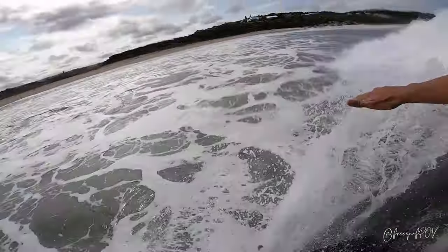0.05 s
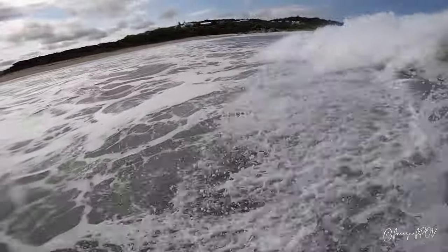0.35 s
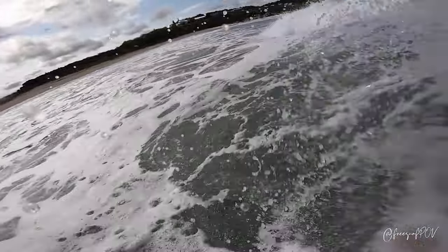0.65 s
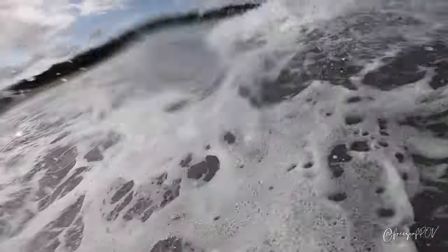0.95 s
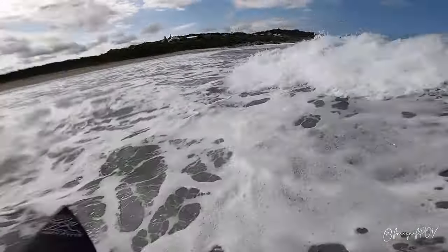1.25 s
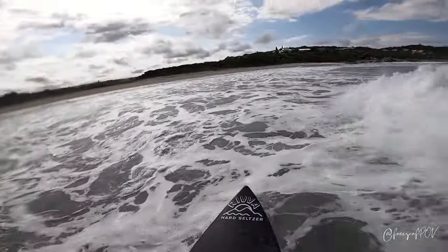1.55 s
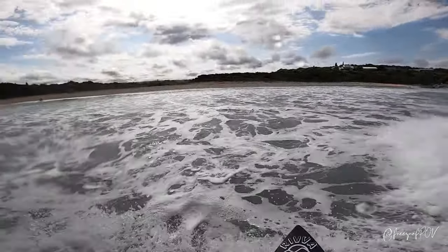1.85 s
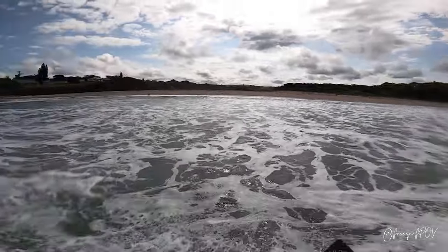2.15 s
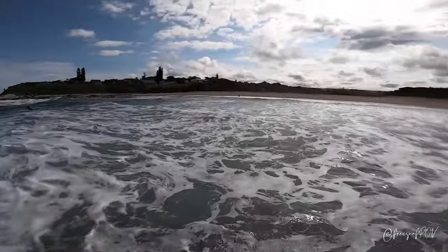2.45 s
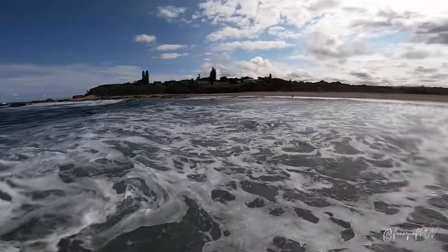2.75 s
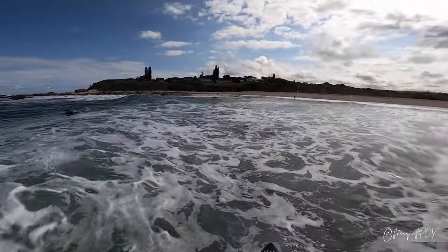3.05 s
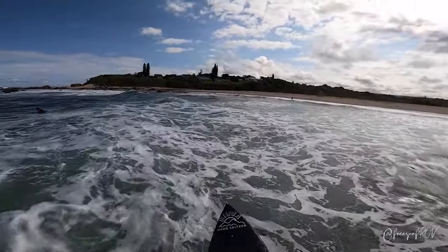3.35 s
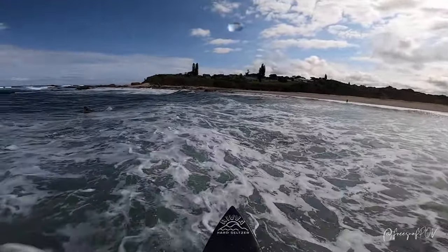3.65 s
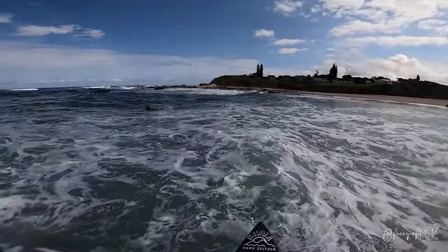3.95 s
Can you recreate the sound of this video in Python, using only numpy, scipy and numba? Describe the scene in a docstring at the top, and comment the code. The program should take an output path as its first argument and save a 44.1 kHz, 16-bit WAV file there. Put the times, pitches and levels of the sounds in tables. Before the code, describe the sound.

White water roars and gurgles close around a surfboard, muffled, with wind rumble.

```python
"""Booming water, buffeting wind and flying spray: a surfer rides through white water, wet camera held close.
The rush of the wave rings in the water-filmed microphone port, and the ring sinks as the ride goes on.
Muffled foam fizzes above it and drops tap the housing. Underfoot the board gurgles, gulps pockets
of air and throws up sheets of water. Everything reaches the one microphone, in mono."""
import sys
import numpy as np
from scipy import signal
from scipy.fft import rfft, irfft
from scipy.io import wavfile
from scipy.ndimage import uniform_filter1d, minimum_filter1d
from numba import njit

SR = 44100
rng = np.random.default_rng(int(sys.argv[2]) if len(sys.argv) > 2 else 0)


def materialize(psi):
    """Save the field psi as 16-bit PCM at rate SR to the path in sys.argv[1].

    A 1-D psi becomes a single channel; in a 2-D psi each row is a channel.
    """
    bounded = np.clip(np.atleast_2d(psi).T, -1, 1)
    quanta = np.round(bounded * 32767).astype(np.int16)
    wavfile.write(sys.argv[1], SR, quanta)


N = 176400

# water film over the microphone port: f/Hz, gain/dB
WATER_FILM = [(100, -7.5), (300, 3), (480, 1.5), (570, 0.5), (660, 0), (715, -4), (775, -17.5),
              (1100, -37.5), (2500, -57)]


def undb(db):
    return 10 ** (np.asarray(db) / 20)


def unit(x):
    """Scale to rms 1."""
    return x / np.sqrt(np.mean(x ** 2))


def curve(rows, column=1):
    """One column of a table, joined by straight lines in time."""
    rows = np.array(rows, float)
    return np.interp(np.arange(N) / SR, rows[:, 0], rows[:, column])


def colour(x, points, rolloff_db_per_oct=30):
    """Causal filter through (f/Hz, gain/dB) points, falling steeply above the last."""
    hz, db = np.array(points, float).T
    octave = np.log2(np.arange(N // 2 + 1) * SR / N + 1)
    octaves_above = np.maximum(octave - np.log2(hz[-1]), 0)
    gain_db = np.interp(octave, np.log2(hz), db) - rolloff_db_per_oct * octaves_above
    cepstrum = irfft(np.log(undb(gain_db)), N)
    cepstrum[1:N // 2] *= 2  # fold to minimum phase
    cepstrum[N // 2 + 1:] = 0
    return irfft(rfft(x) * np.exp(rfft(cepstrum)), N)


@njit
def resonate(x, hz, width_hz):
    """Band-pass with a moving centre."""
    y, band_state, low_state = np.empty(len(x)), 0., 0.
    for i in range(len(x)):
        g, damping = np.tan(np.pi * hz[i] / SR), width_hz / hz[i]
        band = (band_state + g * (x[i] - low_state)) / (1 + g * (g + damping))
        band_state = 2 * band - band_state
        low_state += 2 * g * band
        y[i] = damping * band
    return y


def cavity(x, hz, width_hz):
    """A fixed resonance with steep skirts: two band-passes in series."""
    centre, width = np.full(N, float(hz)), float(width_hz)
    return resonate(resonate(x, centre, width), centre, width)


def walk(rate_hz):
    """Smooth random wander with spread 1."""
    span = max(int(SR / rate_hz), 1)
    drift = uniform_filter1d(rng.standard_normal(N), span, mode="wrap")
    return unit(uniform_filter1d(drift, span, mode="wrap"))


def steady(x, span_s):
    """Hold the rms at 1 over the span, leaving the quick flutter."""
    span = max(int(span_s * SR), 2)
    return x / np.sqrt(uniform_filter1d(uniform_filter1d(x ** 2, span), span // 2) + 1e-12)


def pops(per_s, spread_db=0):
    """Random tiny bursts; a spread makes a few stronger than the rest."""
    size = undb(spread_db * np.minimum(rng.exponential(size=N), 6))
    return (rng.random(N) < per_s / SR) * size * rng.choice([-1, 1], N)


def swells(rows, attack_s=0.0061):
    """Level of surges that rise, hold and die away."""
    t, level = np.arange(N) / SR, np.zeros(N)
    for at, hold, release, db in rows:
        rise = np.clip((t - at) / attack_s, 0, 1)
        level += undb(db) * rise * np.exp(-np.maximum(t - at - hold, 0) / release)
    return level


def splat(at, decay_s):
    """The dying noise burst of one impact."""
    age = np.arange(N) / SR - at
    return rng.standard_normal(N) * (age >= 0) * np.exp(-np.abs(age) / decay_s)


def white_water():
    """Churn, bursting foam and flying spray around the camera flutter with the same turbulence."""
    # t/s, relative level/dB
    churn_level = [(0, -36.5), (.56, -39), (.72, -36.5), (.81, -44), (.86, -39.5), (1.0, -43), (1.13, -39),
                   (1.24, -42.5), (1.47, -37.5), (1.84, -39.5), (2.0, -35.5), (2.165, -42), (2.195, -48),
                   (2.42, -47), (2.55, -49), (2.65, -42), (2.72, -39), (2.95, -37), (3.11, -44.5),
                   (3.28, -54.5), (3.32, -39.5), (3.55, -38), (3.63, -46.5), (3.71, -39.5), (3.76, -50),
                   (4, -45.5)]  # churning water
    foam_level = [(0, -50.5), (.6, -49.5), (.92, -56), (.99, -55.5), (1.08, -53), (1.21, -55.5),
                  (1.29, -47.5), (1.39, -55), (1.46, -45.5), (1.7, -48.5), (1.88, -49.5), (2.05, -43.5),
                  (2.25, -48.5), (2.4, -49), (2.52, -53), (2.8, -52.5), (3.25, -47), (3.38, -45.5),
                  (3.53, -46), (3.63, -50.5), (3.75, -49), (3.92, -52.5), (4, -48)]  # fizzing foam
    spray_level = [(0, -41.5), (.16, -41.5), (.225, -40), (.29, -45), (.35, -41.5), (.43, -49), (.6, -62),
                   (.9, -88)]  # spray flying past the lens
    patter_level = [(0, -54.5), (.3, -51.5), (.41, -43.5), (.52, -36.5), (.61, -42.5), (.71, -40),
                    (.77, -46.5), (.80, -50.5), (.86, -49.5), (.97, -58), (1.1, -92)]  # spray drumming on the housing
    # spectra of the same four: f/Hz, level/dB
    churn_colour = [(400, -16), (700, 6.5), (860, 0.5), (1020, -4), (1180, -6), (1380, -13.5), (1900, -22),
                    (2600, -24.5), (4500, -48)]
    foam_colour = [(700, 5.5), (1400, 7.5), (2000, -0.5), (2800, -3), (3450, -8.5), (4100, -8.5),
                   (4800, -23), (5700, -29.5), (7000, -47.5), (10000, -76)]
    spray_colour = [(800, -6.5), (1400, -1), (1950, 1.5), (2350, -6), (3200, -11), (3650, -20), (4100, -20),
                    (5600, -26), (7000, -37.5), (8200, -45), (9600, -43), (11500, -57), (15000, -71)]
    patter_colour = [(800, -7), (1200, 6), (1600, 0), (2000, -1), (2400, -18), (2800, -25), (3400, -16.5),
                     (4050, -14.5), (4700, -27), (5700, -29), (7000, -37), (9500, -52.5), (14000, -72.5)]
    eddies_db = walk(rate_hz=106)
    flutter = undb(eddies_db)
    churn = unit(colour(rng.standard_normal(N), churn_colour) * undb(2 * eddies_db))
    foam = unit(colour(pops(per_s=5000, spread_db=0.5), foam_colour) * flutter)
    spray = unit(colour(pops(per_s=4000), spray_colour) * flutter)
    patter = unit(colour(pops(per_s=7100, spread_db=2), patter_colour) * flutter)
    return (churn * undb(curve(churn_level) + 6) + foam * undb(curve(foam_level) + 5)
            + spray * undb(curve(spray_level) + 3) + patter * undb(curve(patter_level)))


def smothered(x, hz=2620., width_hz=1100.):
    """A coat of foam on the microphone hollows the treble out of the sound passing through it."""
    # the foam's hollow: t/s, depth/dB
    hollow = [(.45, 4), (.65, 7.5), (.91, 2.5), (.96, 10), (1.02, 8.5), (1.07, 1)]
    band = resonate(x, np.full(N, hz), width_hz)
    return x - band * (1 - undb(-curve(hollow)))


def runoff(hz=4230, width_hz=2080):
    """Water spatters finely as it runs off the microphone."""
    # trickles: t/s, hold/s, release/s, level/dB
    trickles = [(1.025, 0.034, .01, -67), (1.072, .035, 0.017, -61.5)]
    spatter = cavity(pops(per_s=1200), hz, width_hz)
    return unit(cavity(spatter, hz, width_hz)) * swells(trickles)


def drops():
    """Right on the housing, drops land with a brief dull ring and hard flecks of spray tick."""
    # drops: t/s, peak/dB, f/Hz, decay/s
    landings = [(0.2226, -37, 4090, 0.0033), (0.769, -42, 2620, 0.0043), (0.9096, -34.5, 2400, 0.0031),
                (1.162, -43.5, 2800, .005), (1.284, -40, 2730, 0.0049), (1.342, -39, 2690, 0.0045),
                (1.823, -36.5, 2820, .005), (2.333, -32, 2590, .005), (3.021, -38, 2760, 0.0057)]
    # hard flecks: t/s, peak/dB, decay/s
    flecks = [(0.161, -42, .0006), (.2125, -40, .001), (0.2229, -30, .0025), (0.243, -44, 0.00053),
              (0.2738, -33.5, .0007), (.769, -50.5, .002), (.917, -53.5, .002)]
    # damping by the wet housing, and a fleck's spectrum: f/Hz, gain/dB
    wet_housing = [(1500, -1), (2850, -0.5), (3300, -9), (4200, -6.5), (5200, -14.5)]
    tick_colour = [(800, -8), (2000, 19.5), (3300, 11.5), (4100, 8.5), (4900, 1.5), (6200, 0.5),
                   (9000, -13), (13000, -23), (16000, -42.5)]
    out = np.zeros(N)
    for at, db, hz, decay in landings:
        tap = colour(cavity(splat(at, decay), hz, width_hz=780), wet_housing)
        out += undb(db) * tap / np.abs(tap).max()
    for at, db, decay in flecks:
        tick = colour(splat(at, decay), tick_colour)
        out += undb(db) * tick / np.abs(tick).max()
    return out


def splashes():
    """Sheets of water thrown up by the board fall as a dense bright patter."""
    # sheets: t/s, hold/s, release/s, level/dB
    sheets = [(1.419, 0.14, 0.14, -42), (2.314, 0.023, 0.023, -46), (2.977, 0.038, .02, -49.5)]
    # their spectrum: f/Hz, level/dB
    sheet_colour = [(900, -14.5), (1600, -1.5), (2250, 1.5), (2800, 2), (3200, -16.5), (3700, -22),
                    (4300, -11.5), (4900, -34.5), (6000, -39.5), (8000, -63)]
    return unit(colour(pops(per_s=970), sheet_colour)) * swells(sheets)


def sloshes():
    """Water slaps and bubbles along the rail of the board, heard through the housing."""
    # slaps: t/s, hold/s, release/s, relative level/dB, f/Hz
    slaps = [(1.275, .018, .012, -32, 920), (2.135, 0.035, .007, -32, 850), (3.302, 0.088, .02, -33.5, 983),
             (3.375, .035, 0.032, -36.5, 1170), (3.415, 0.039, 0.018, -34.5, 900),
             (3.485, .06, .023, -36, 1035), (3.689, 0.019, .012, -37, 840)]
    # muffling by the wet housing: f/Hz, gain/dB
    muffling = [(700, 4.5), (1200, -2.5), (1500, -18)]
    out = np.zeros(N)
    for at, hold, release, db, hz in slaps:
        bubbling = steady(cavity(pops(per_s=900), hz, width_hz=280), span_s=0.025)
        out += bubbling * swells([(at, hold, release, db)])
    return colour(out, muffling)


def gurgle():
    """Water gurgles hollowly round the board, heard through the film on the port."""
    # gurgling: t/s, level/dB
    level = [(0, -47), (1.8, -29), (2.0, -28), (2.13, -19.5), (2.4, -24.5), (2.6, -29), (2.85, -22.5),
             (3.1, -33), (3.3, -24.5), (3.65, -27), (4, -31.5)]
    hollow = cavity(rng.standard_normal(N), hz=347, width_hz=250)
    return steady(colour(hollow, WATER_FILM), span_s=0.3) * undb(curve(level))


def gulps(rise_s=0.014, sag_s=0.14):
    """Pockets of air trapped under the board boom briefly, their pitch sagging."""
    # air pockets: t/s, starting f/Hz, peak/dB
    pockets = [(1.391, 250.5, -11), (1.428, 167, -18.5), (1.775, 187, -20), (2.16, 345, -18.5),
               (2.47, 189, -26), (2.955, 196, -17.5), (3.307, 285, -18), (3.359, 141, -17.5),
               (3.455, 140, -20), (3.631, 144.5, -16)]
    out = np.zeros(N)
    for at, hz, db in pockets:
        age = np.maximum(np.arange(N) / SR - at, 0)
        swell = age / rise_s * np.exp(1 - age / rise_s)
        cycles = hz * sag_s * (1 - np.exp(-age / sag_s))
        out += undb(db) * swell * np.sin(2 * np.pi * cycles)
    return out


def wind():
    """Slow eddies press directly on the microphone."""
    # buffeting: t/s, relative level/dB
    buffets = [(0.0, -19.5), (0.83, -18), (1.05, -27.5), (1.34, -21.5), (1.44, -32), (1.46, -19),
               (1.89, -30), (2.12, -24.5), (2.18, -54), (2.29, -26.5), (3.97, -28), (4.0, -39)]
    # its spectrum: f/Hz, level/dB
    buffet_colour = [(5, -14), (20, 2), (35, -1), (80, -2), (115, -7.5), (160, -13), (240, -25), (500, -60)]
    rumble = steady(colour(rng.standard_normal(N), buffet_colour), span_s=0.044)
    return rumble * undb(curve(buffets) - 1)


def rush():
    """The wave's rushing water makes a low roar at close range."""
    # body of the rush: t/s, relative level/dB
    level = [(0, -22.5), (.3, -23.5), (.6, -27), (1.1, -27), (1.36, -20.5), (1.56, -22), (1.75, -25),
             (1.95, -22.5), (2.16, -27), (2.47, -18), (2.57, -22.5), (2.8, -25), (3.0, -25), (3.15, -23.5),
             (3.3, -22), (3.5, -23.5), (3.65, -22.5), (3.85, -28), (4, -26)]
    # its spectrum: f/Hz, level/dB
    rush_colour = [(30, -28), (80, -7), (125, -1.5), (175, 1), (260, -1), (340, -5), (450, -8.5),
                   (650, -11), (715, -19), (790, -37), (1300, -58)]
    roar = steady(colour(rng.standard_normal(N), rush_colour), span_s=0.11)
    return roar * undb(curve(level) + 1.5)


def port_ring(width_hz=112.6, wobble=0.022):
    """The wave raises a narrow, wavering ring in the wet microphone port."""
    # port resonance: t/s, f/Hz, relative level/dB
    resonance = [(0, 531, -18), (.17, 568, -17.5), (.6, 512, -20.5), (.8, 544, -21.5), (1.1, 538, -20.5),
                 (1.35, 522, -21), (1.7, 521, -21.5), (2.1, 492, -20), (2.5, 468, -20), (2.9, 444, -20.5),
                 (3.3, 477, -18.5), (3.55, 450, -22.5), (3.8, 475, -19), (4, 483, -23)]
    hz = curve(resonance) * (1 + wobble * walk(rate_hz=20))
    ring = colour(resonate(rng.standard_normal(N), hz, width_hz), WATER_FILM)
    return steady(ring, span_s=0.087) * undb(curve(resonance, column=2) - 1)


def scene():
    """All sources at the one microphone, riding with the surfer."""
    wave = wind() + rush() + port_ring() + gurgle() + gulps() + smothered(white_water())
    return (wave + splashes() + runoff() + sloshes() + drops())[None, :]


def record(dry, ceiling=0.52, knee=8, smooth_s=0.0051, top_hz=14200):
    """The camera's limiter eases down the highest peaks; the top is cut."""
    span = int(smooth_s * SR)
    needed_gain = (1 + (np.abs(dry) / ceiling) ** (2 * knee)) ** (-.5 / knee)
    held_gain = minimum_filter1d(needed_gain, 2 * span)
    gain = uniform_filter1d(uniform_filter1d(held_gain, span), span)
    return signal.sosfilt(signal.ellip(8, .2, 70, top_hz, fs=SR, output="sos"), dry * gain)


dry = scene()
out = record(dry)
materialize(out)
```